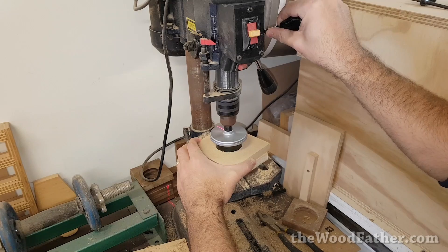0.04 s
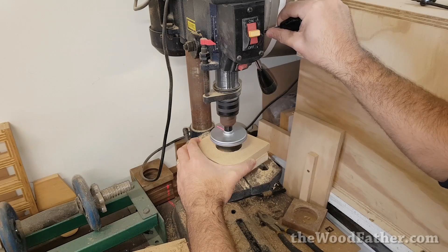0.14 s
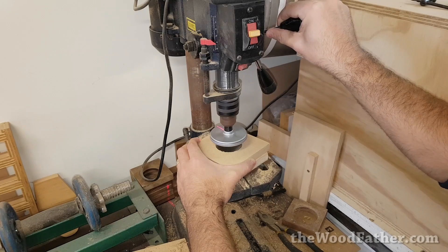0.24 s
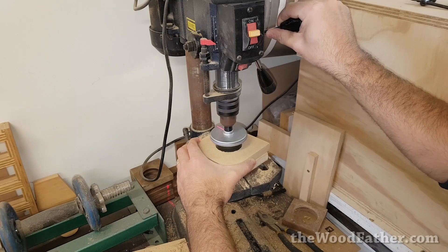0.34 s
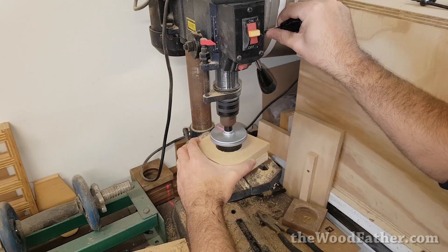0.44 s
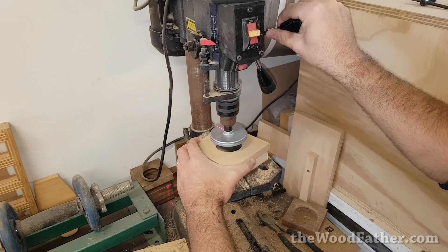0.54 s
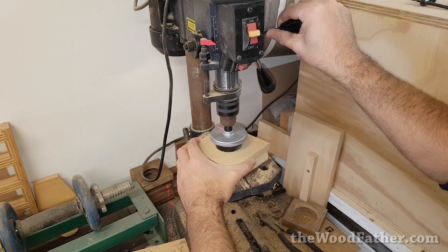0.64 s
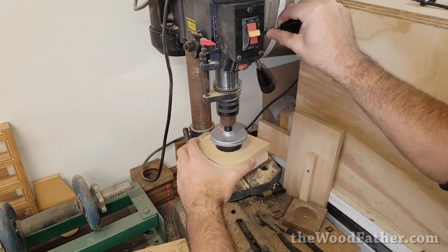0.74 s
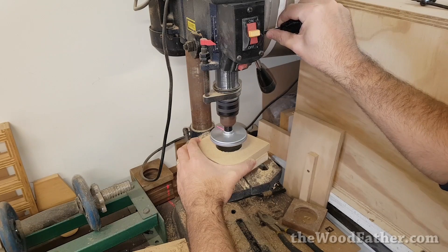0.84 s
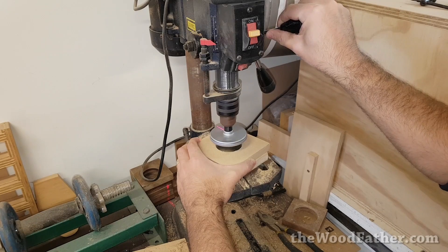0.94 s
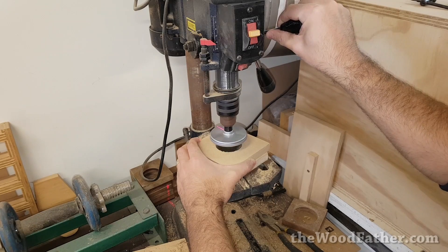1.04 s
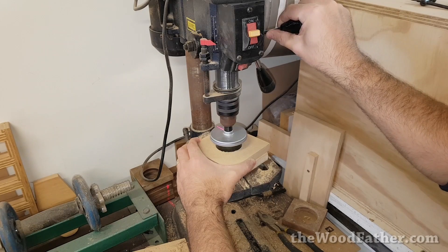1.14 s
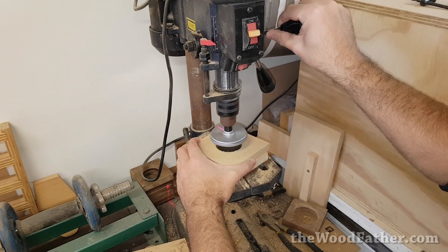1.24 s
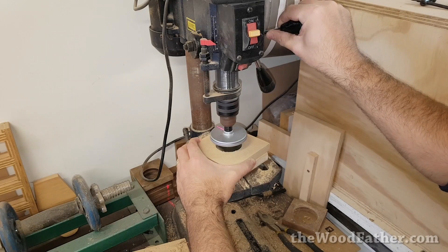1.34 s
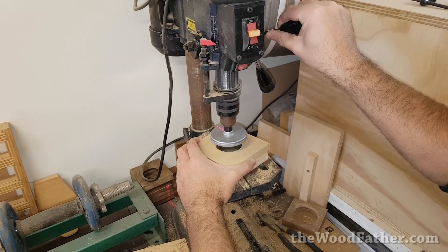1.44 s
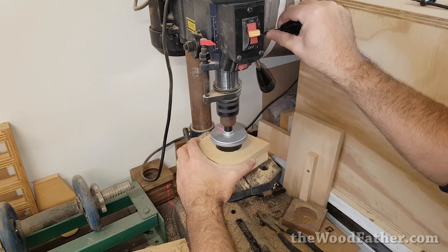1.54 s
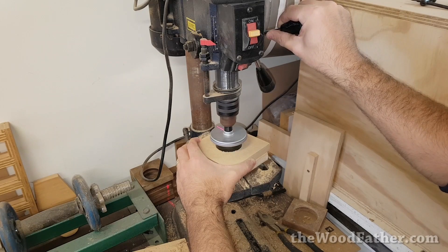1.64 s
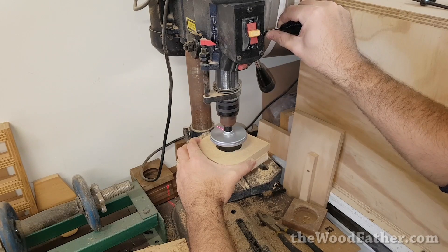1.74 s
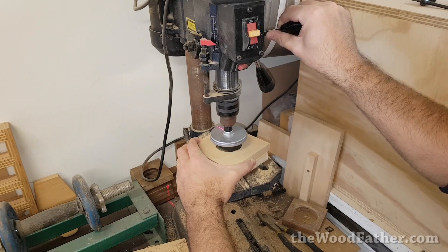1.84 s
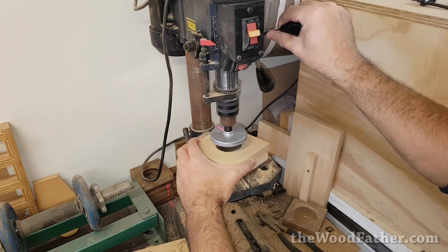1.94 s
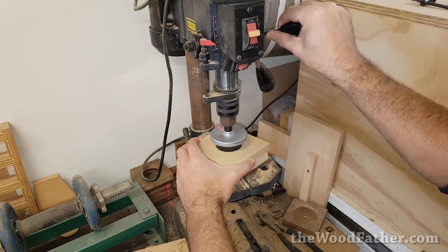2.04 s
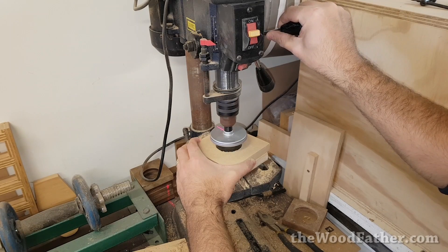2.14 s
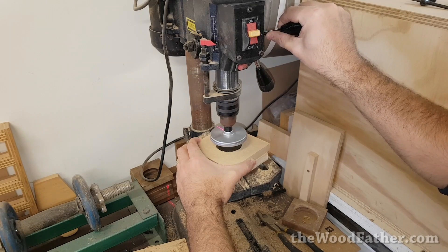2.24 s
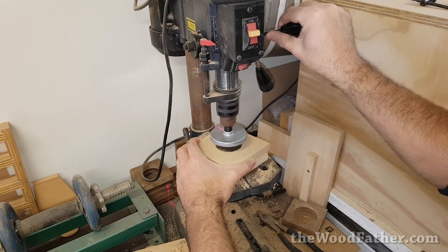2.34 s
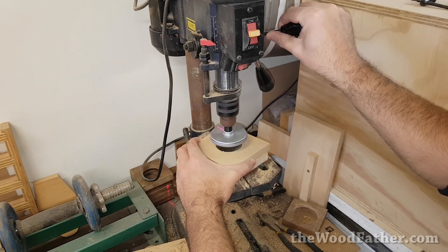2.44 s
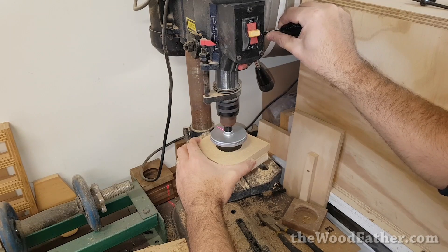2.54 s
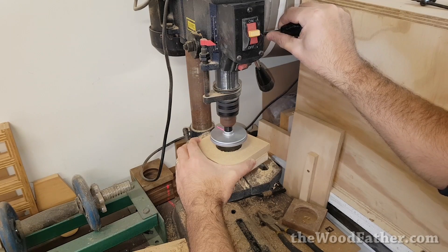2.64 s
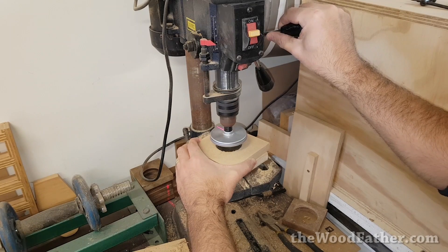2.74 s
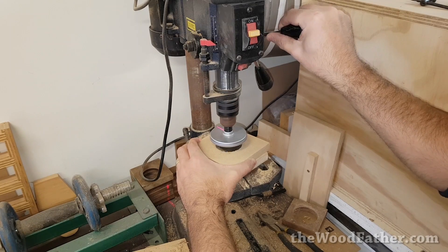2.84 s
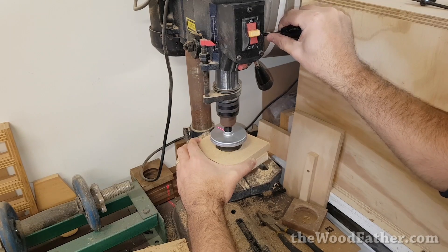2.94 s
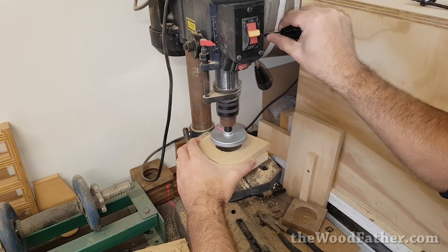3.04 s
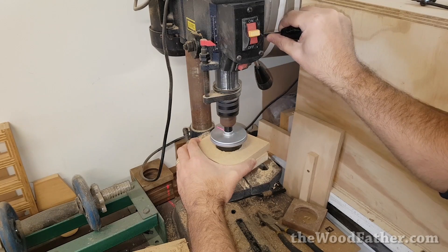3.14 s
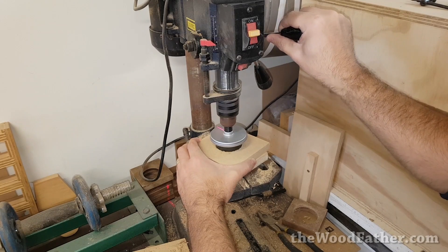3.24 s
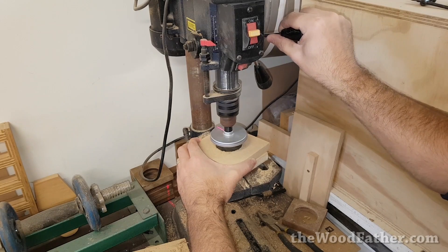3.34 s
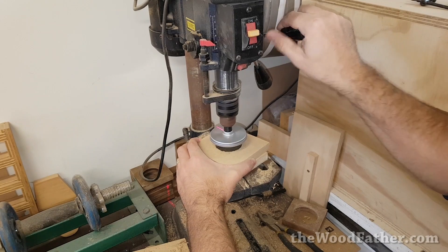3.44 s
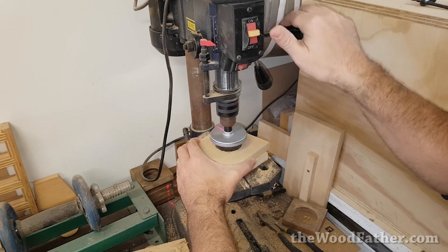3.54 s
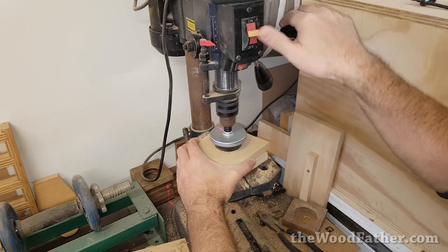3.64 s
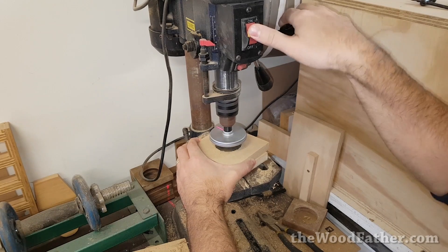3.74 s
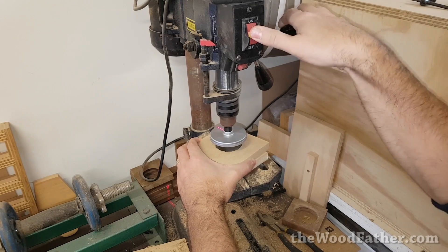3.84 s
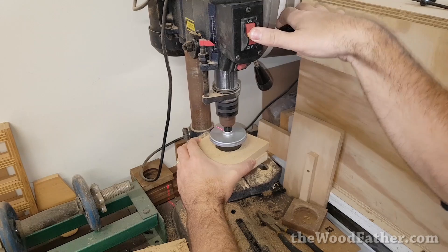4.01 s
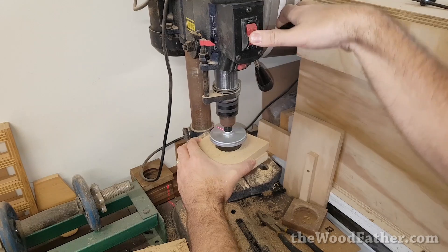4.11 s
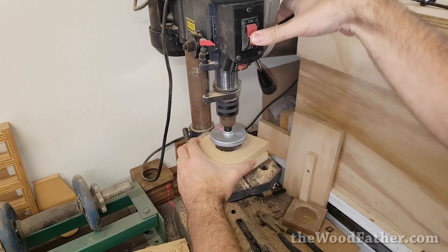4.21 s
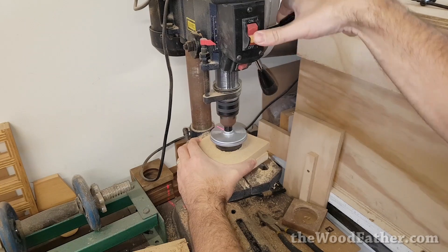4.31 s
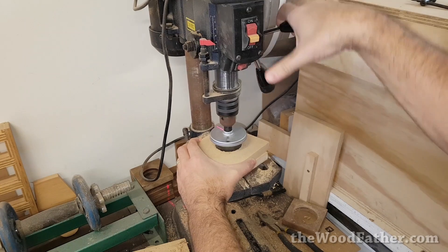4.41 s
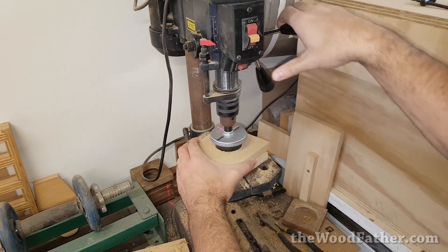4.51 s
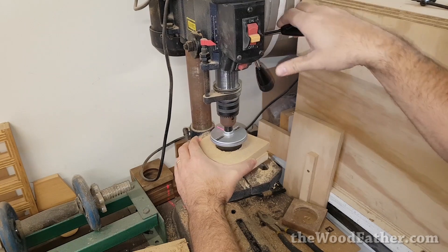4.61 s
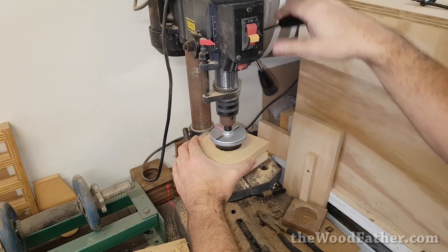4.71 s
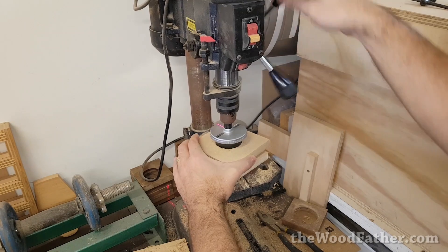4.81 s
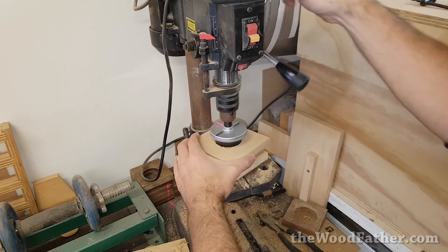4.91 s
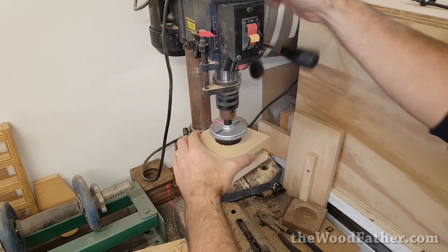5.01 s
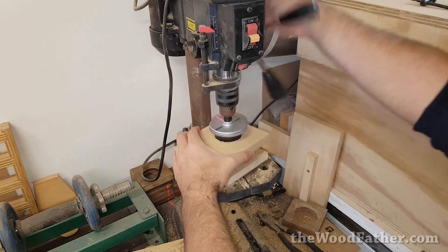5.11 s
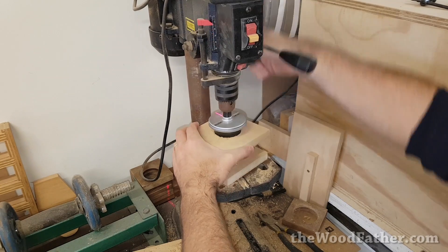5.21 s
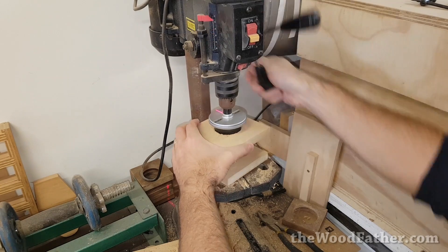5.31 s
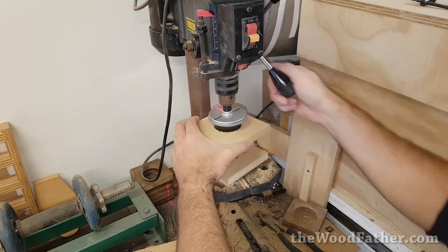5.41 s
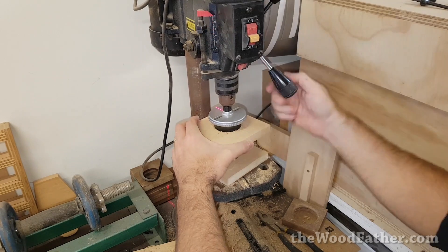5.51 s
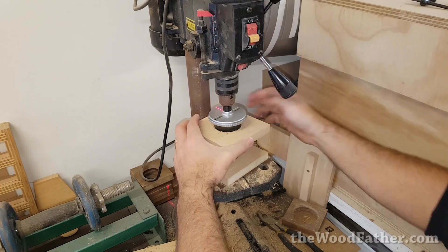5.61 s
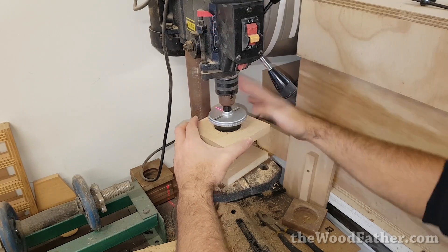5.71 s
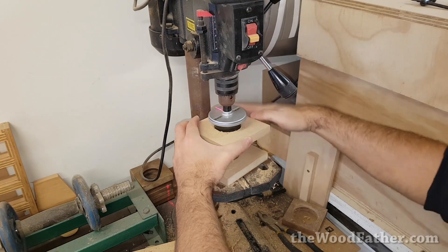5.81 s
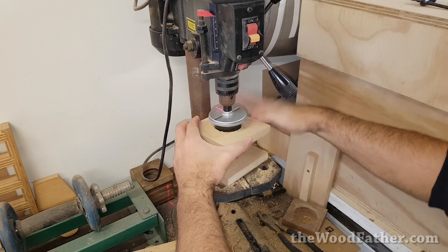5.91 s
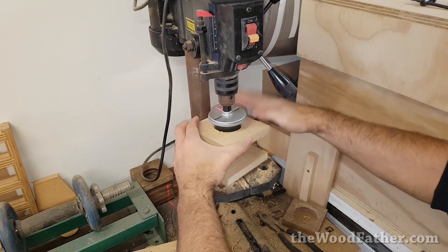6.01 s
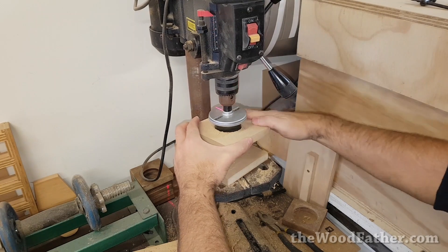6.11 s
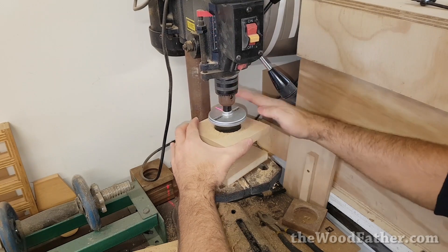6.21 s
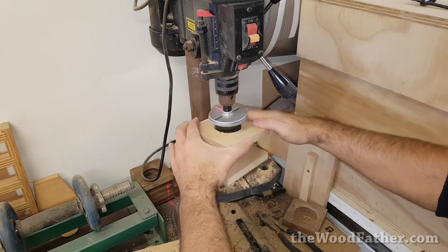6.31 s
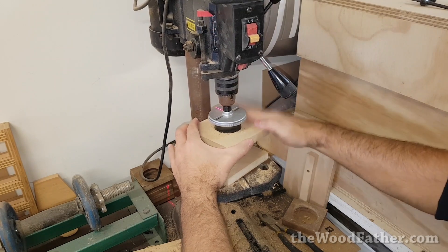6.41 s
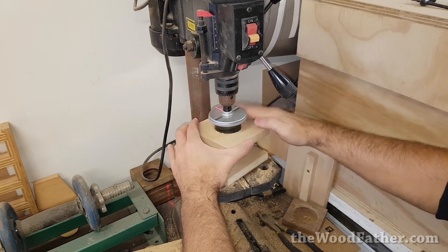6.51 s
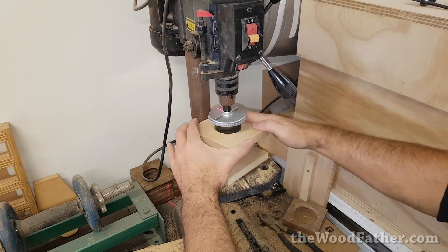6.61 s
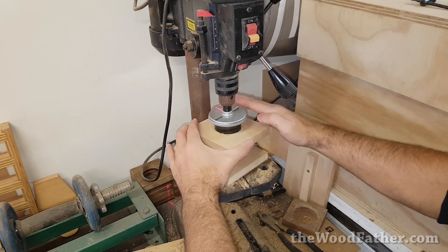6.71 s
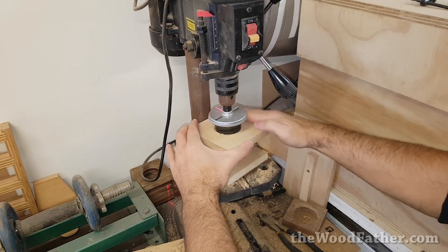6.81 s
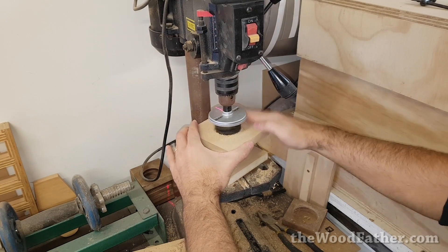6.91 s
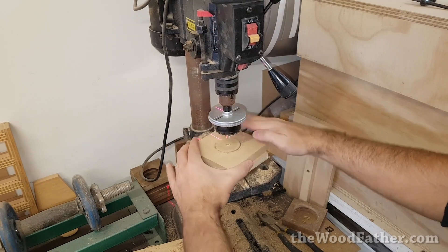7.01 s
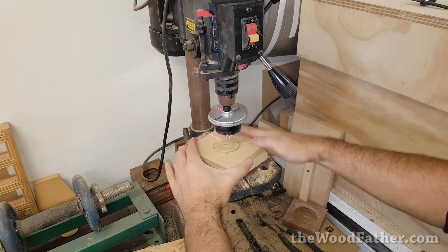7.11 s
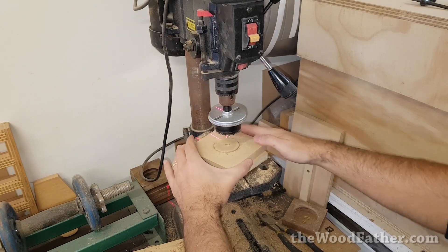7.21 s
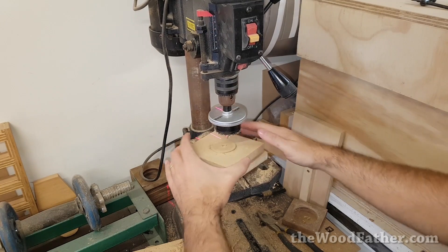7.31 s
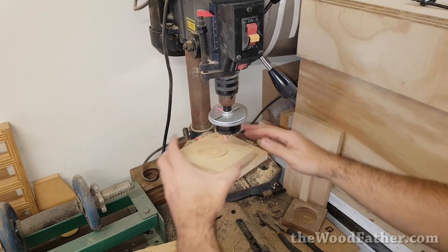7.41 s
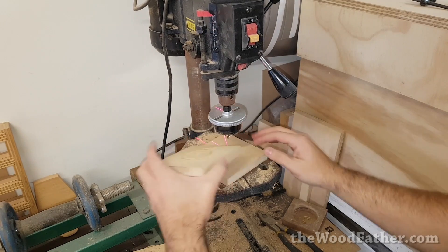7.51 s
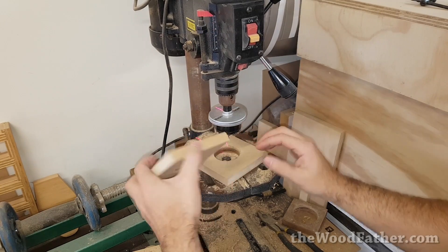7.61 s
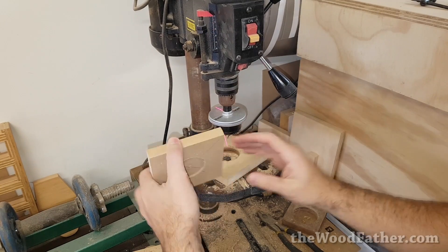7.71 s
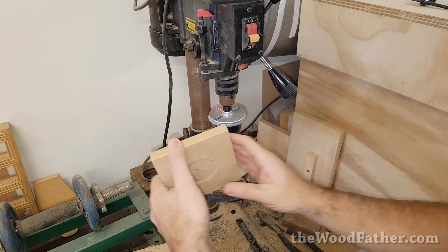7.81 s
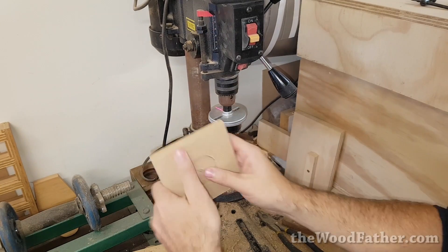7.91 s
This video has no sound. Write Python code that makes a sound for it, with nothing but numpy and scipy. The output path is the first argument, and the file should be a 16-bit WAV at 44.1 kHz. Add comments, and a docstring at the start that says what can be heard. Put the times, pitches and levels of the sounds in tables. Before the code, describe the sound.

In a small workshop, a drill press hums while a hole saw rasps and chatters through a wooden board. The cutting ends and the motor runs freely, then a switch snaps sharply and it winds down. The feed lever rattles and clanks back to its stop. A hand pats the board several times, and it drops with a loud wooden clap and slides faintly. The sounds are close, with a short room echo.

```python
"""A hole saw chatters and rasps through a board over the hum of a drill press in a small workshop. Its teeth
tear the wood and ring the cup; it breaks through, the feed eases, the switch snaps off and the motor coasts to
rest. The quill rattles up its rack and knocks on its stop. A hand pats the board off the saw; it drops on the
table, then rubs against the saw. Running parts are wavering tones and shaped noise; blows are noise puffs and
ringing modes with the shop's reverb."""
import sys
import numpy as np
from scipy import signal
from scipy.fft import rfft, irfft, next_fast_len
from scipy.io import wavfile
from scipy.ndimage import uniform_filter1d, map_coordinates

SR = 44100
rng = np.random.default_rng(int(sys.argv[2]) if len(sys.argv) > 2 else 0)


def unload_audio(sound):
    """Save the sound as a 16-bit wav file, at the path given as the first command line argument."""
    columns = np.transpose(np.atleast_2d(sound))
    # keep every value between -1 and 1, then stretch to whole-number steps
    steps = np.round(np.clip(columns, -1, 1) * 32767)
    wavfile.write(sys.argv[1], SR, steps.astype(np.int16))


N = 350595
TIME_S = np.arange(N) / SR

# powered shaft, sagging under load: time_s, speed_hz, free_fourth_order_db
SHAFT_SPEED = [(0, 45.1, -40), (.7, 40.56, -40), (1.3, 44.43, -40), (2.76, 45.16, -40), (2.9, 47.4, -40),
               (3.4, 47.8, -44), (3.56, 47.6, -35), (3.9, 48.4, -42), (4.1, 49.5, -32), (4.2, 47.5, -42)]
# main hum throbbing under load: time_s, relative_db
HUM_THROB = [(0.0, -32), (0.078, -15.5), (0.12, -41), (0.15, -26), (0.26, -20.5), (0.29, -24), (0.32, -21),
             (0.49, -34), (0.54, -26), (0.59, -38), (0.62, -23.5), (0.65, -39), (0.81, -29), (0.86, -37),
             (0.96, -30.5), (1.01, -32), (1.13, -28.5), (1.15, -32.5), (1.43, -20), (1.46, -37), (1.5, -24),
             (1.7, -30), (1.84, -24.5), (1.87, -44), (1.89, -20.5), (1.95, -31), (1.99, -20.5), (2.06, -31),
             (2.33, -19.5), (2.37, -32.5), (2.41, -20), (2.47, -31), (2.57, -27), (2.6, -33), (2.62, -34),
             (2.69, -35), (2.71, -25.5), (2.76, -21), (2.87, -40.5), (2.9, -19)]
# low shaft orders: multiple, cutting_db, free_db, roughness
SHAFT_LOW_ORDERS = [(1, -63, -53, 0.9), (2, -50, -42.5, 0.4), (3, -43.5, -56, 0.8)]
# faint shaft orders under power: multiple, level_db
SHAFT_WEAK_ORDERS = [(9, -46)]
# tooth strikes: time_s, rate_hz, third_relative_db, fourth_relative_db
TOOTH_STRIKES = [(0, 171.1, -43, -33.5), (.25, 169.6, -31.5, -34.5), (.4, 161.9, -30.5, -39),
                 (.55, 153.1, -35.5, -37), (.78, 154.3, -31, -36), (.95, 159.9, -38.5, -53),
                 (1.2, 171.5, -36, -35.5), (1.35, 173.3, -35.5, -35), (1.6, 171.2, -35, -37.5),
                 (1.8, 170, -39, -44), (2.05, 166.9, -37.5, -48), (2.35, 176, -34, -38.5),
                 (2.55, 165.2, -34, -43), (2.8, 170.2, -43, -41)]
# tooth-rate harmonics: multiple, re_cut_db
CHATTER_ORDERS = [(1, -14), (2, -14), (5, -15), (6, -17), (7, -23.5)]
# saw wall, rung as teeth catch: pitch_hz, re_cut_db
WALL_MODES = [(1040, -18.5), (1115, -17), (1200, -14), (1285, -12), (1335, -20)]
# saw cup singing as it sinks in: time_s, mid_mode_hz, mid_db, low_db, high_db
CUP_RASP = [(0, 3560, -41.5, -59, -60), (.6, 3540, -46, -72, -72), (1.1, 3546, -44.5, -64, -56),
            (1.5, 3456, -44, -51, -51), (2, 3420, -44.5, -43.5, -46), (2.27, 3433, -42.5, -47, -45.5),
            (2.75, 3314, -46, -43, -49), (2.899, 3255, -48, -56, -73), (4.15, 3047, -50, -60, -50),
            (4.5, 3000, -64, -75, -63)]

# thumb lands, rocker snaps: start_s, level_db, treble_edge_hz
SWITCH_HITS = [(3.746, -20.5, 2490), (4.155, -1.5, 30020)]
# motor's inner switch rubs, closes: start_s, level_db
INNER_SWITCH_HITS = [(4.474, -41.5), (4.58, -40.5)]
# two pulls upward: time_s, rumble_db, scrape_db
QUILL_PULLS = [(4.752, -37, -61.5), (4.8, -39, -59), (4.886, -36, -42.5), (5.006, -41.5, -73),
               (5.064, -42.5, -64.5), (5.19, -28, -37.5), (5.252, -31.5, -46.5), (5.412, -45.5, -65),
               (5.46, -48, -57), (5.6, -75, -85)]
# quill shaking after its stop: start_s, rumble_db, scrape_db
QUILL_SHUDDERS = [(5.472, -30, -41.5), (5.602, -55, -49.5)]
# pinion teeth: start_s, ring_db, tick_db
RACK_HITS = [(4.75, -44.5, -41), (4.807, -41, -39.5), (4.839, -41, -35), (4.866, -40, -34),
             (4.886, -46, -38.5), (4.92, -41, -38), (4.977, -38, -49), (5.012, -35.5, -47),
             (5.05, -37.5, -39), (5.084, -37, -38), (5.114, -53, -34), (5.137, -38, -33), (5.158, -38, -33),
             (5.175, -46.5, -30.5), (5.193, -46.5, -30.5), (5.213, -34, -31)]
# quill and lever knocks: start_s, clank_db, thud_db, treble_edge_hz, ring_hz
STOP_HITS = [(4.888, -26.5, -28, 6000, 2840), (5.226, -28, -51, 5010, 1940), (5.237, -22.5, -38, 3000, 510),
             (5.257, -25.5, -44, 6060, 2760), (5.474, -24, -23, 5990, 2900),
             (5.487, -23.5, -34, 7000, 1840), (5.603, -30.5, -40, 3520, 1700),
             (5.617, -37, -43, 3510, 1640), (5.643, -48, -43, 3000, 1500)]
# hand on the board: start_s, slap_db, treble_edge_hz, thump_db, pitch_hz
PAT_HITS = [(5.801, -36, 2500, -48, 250), (5.811, -37, 8970, -27.5, 256), (5.884, -49, 9000, -46, 220),
            (5.991, -34, 14000, -27, 274), (6.158, -33, 14000, -26, 217), (6.324, -34, 13950, -24, 222),
            (6.489, -32.5, 25000, -30, 250), (6.656, -31.5, 25000, -25.5, 221),
            (6.823, -32, 25000, -27.5, 227), (6.887, -43.5, 20000, -38.5, 238),
            (6.9, -37.5, 20000, -47.5, 240), (6.911, -43.5, 20000, -52, 240),
            (6.982, -31.5, 25000, -32, 257)]
# board lands, settles: start_s, clap_db, thud_db, treble_edge_hz
DROP_HITS = [(7.054, -3.5, -35, 30000), (7.178, -17.5, -27.5, 1210)]

# noise spectra: freq_hz, density_db
TEARING_SPECTRUM = [(130, -33), (220, -28), (254, -9.5), (364, -8), (502, -5.5), (569, -3.5), (681, -5),
                    (907, -9), (1230, -4.5), (2260, -18), (3610, -20), (4240, -21.5), (7270, -23.5),
                    (14900, -36), (16000, -30.5)]
DRONE_SPECTRUM = [(32, -51.5), (55, -18), (92, -5), (124, -7), (194, 4.5), (328, -11.5), (403, -4.5),
                  (438, -4), (510, -7.5), (636, -12.5), (741, -24.5), (1500, -31), (3300, -120)]
WHIRR_SPECTRUM = [(410, -28), (700, 0), (830, 2.5), (984, -5.5), (1060, 0), (1400, -8), (1890, -10.5),
                  (3200, -8.5), (3990, -14), (7200, -15.5), (9730, -20.5), (14600, -24), (16000, -26.5)]
AIR_SPECTRUM = [(15, -34), (25, -0.5), (105, 3.5), (145, -6.5), (206, -5.5), (754, -19.5), (1400, -25.5),
                (2760, -28.5), (9570, -42.5), (13600, -31), (16000, -38.5)]
SNAP_SPECTRUM = [(180, -40.5), (300, -27), (337, -36), (398, -10), (723, -13.5), (1020, -7), (1130, -7),
                 (2020, -18), (2590, -15.5), (5650, -28), (12500, -31.5), (15800, -33.5)]
BENCH_THUD_SPECTRUM = [(21, -42.5), (35, -19), (64, -12), (140, -6.5), (194, 2.5), (237, -4), (458, -5.5),
                       (627, -23.5), (931, -29), (1800, -29), (2340, -64), (3960, -120)]
INNER_SWITCH_SPECTRUM = [(700, -3.5), (1200, -12), (1750, 1.5), (2300, -7), (3000, -12), (4500, -32),
                         (16000, -46.5)]
SCRAPE_SPECTRUM = [(530, -4), (900, 0.5), (956, -11), (1120, 1), (1400, -0.5), (1870, 2), (6280, -15),
                   (7510, -15), (9660, -19), (15800, -20.5)]
TICK_FIZZ_SPECTRUM = [(3500, -33.5), (7400, 5), (9500, -2), (13000, -4.5), (15800, -7)]
SLAP_SPECTRUM = [(400, -26.5), (750, -11.5), (1600, -6), (2300, -14), (3100, -9.5), (4200, -17),
                 (8000, -20.5), (13000, -22.5), (16000, -21.5)]
BOARD_CLAP_SPECTRUM = [(82, -34), (140, -11), (269, -10), (335, 1), (479, -5), (529, -10), (1100, -0.5),
                       (1370, -8), (1700, -5.5), (2300, -11), (2900, -10.5), (3700, -21), (7380, -38.5),
                       (11900, -48.5), (15100, -56.5), (16000, -88.5)]
# press answering the palm: pitch_multiple, density_db
PALM_SPECTRUM = [(.1, -46), (.3, -10.5), (.6, -5), (1, -3.5), (1.5, -9), (2.1, -11.5), (2.8, -25.5),
                 (7, -29), (15, -100)]

# body resonances: centre_hz, width_hz, gain_db
HEAD_CASTING_PEAKS = [(187, 14, -5), (320.2, 10, -6.5), (405, 10, -5.5), (463, 11, -8), (508, 25, -16.5),
                      (662, 15, -19), (849, 16, -14.5), (1037, 25, -17), (1120, 43, -11), (1186, 49, -13.5),
                      (1288, 56, -16), (1660, 100, -16.5)]
SWITCH_BOX_PEAKS = [(430, 90, 5.5), (880, 150, 0.5), (1360, 240, 4), (1660, 320, -0.5), (2900, 830, -5),
                    (6000, 3300, -24.5), (12100, 1700, -9)]
SLEEVE_PEAKS = [(175, 56, 4.5), (477, 79, 3), (842, 29, -8), (1120, 160, -12.5)]
BOARD_EDGE_PEAKS = [(1100, 240, 5), (2900, 800, -1.5)]
BOARD_RUB_PEAKS = [(1620, 300, -8), (2150, 250, -9), (3050, 240, 1), (5670, 500, -15), (7300, 1070, -19)]
# struck modes: pitch_hz, level_db, t60_s
PINION_MODES = [(3450, 0, .035), (4650, -6, .03), (7400, -11, .03)]
BOARD_MODES = [(165, -4, .1), (240, -5, .07), (335, -4, .07), (470, -1, 0.06), (673, -7, .04),
               (953, -8, .08), (1110, -1, 0.3), (1696, -7, .09), (2430, -11, .1), (2760, 3, .01)]

# shop reverb: freq_hz, t60_s
SHOP_DECAY = [(100, 0.86), (400, 0.27), (2000, 0.35), (10000, 0.31)]
# left-right likeness: freq_hz, correlation
STEREO_LIKENESS = [(60, 0.92), (120, 0.98), (240, 0.92), (480, 0.87), (950, 0.32), (1890, 0.23),
                   (3770, 0.33), (7520, 0.19), (15000, -0.23)]
# channel balance: freq_hz, left_over_right_db
STEREO_LEAN = [(60, -3), (180, 0.5), (550, -2), (1650, -1.5), (4970, -2), (15000, 2)]

THROUGH_S, EASE_S, OFF_S = 2.79, 3.54, 4.155  # breakthrough, feed let go, power cut
SPINDLE_RATIO, BELT_RATIO = .36, .17  # turns per shaft turn
LEFT_RIGHT = np.array([[1], [-1]])


def amp(db):
    """Gain of a level in dB."""
    return 10 ** (np.asarray(db) / 20)


def unit(x):
    """x at rms 1."""
    return x / np.sqrt(np.mean(x ** 2) + 1e-20)


def along(points, hz):
    """Interpolate (freq_hz, value) points on a log axis."""
    knots_hz, values = np.transpose(points)
    return np.interp(np.log(hz + 1), np.log(knots_hz + 1), values)


def curves(rows):
    """One value per sample for each column after the time."""
    knots_s, *columns = np.transpose(rows)
    return [np.interp(TIME_S, knots_s, column) for column in columns]


def during(start_s, end_s, edge_s=.033):
    """1 between two times, with soft edges."""
    fade_in = np.clip((TIME_S - start_s) / edge_s + .5, start_s <= 0, 1)
    return fade_in * np.clip((end_s - TIME_S) / edge_s + .5, 0, 1)


def wobble(rate_hz):
    """Smooth random curve, rate_hz knots a second."""
    knots = rng.standard_normal(int(N * rate_hz / SR) + 4)
    coarse = np.arange(N // 32 + 2) * 32
    return np.interp(np.arange(N), coarse, map_coordinates(knots, [coarse * rate_hz / SR]))


def tone(phase, db, roughness, rate_hz=10):
    """Sine wavering in level and phase."""
    gain = amp(db + 3.03 * roughness * wobble(rate_hz))
    return gain * np.sqrt(2) * np.sin(phase + roughness * wobble(1.2 * rate_hz))


def filtered(x, response):
    """x through a complex frequency response."""
    size = next_fast_len(x.shape[-1] + 8192)
    return irfft(rfft(x, size) * response(np.fft.rfftfreq(size, 1 / SR)), size)[..., :x.shape[-1]]


def dulled(x, edge_hz):
    """A softer contact loses treble."""
    return filtered(x, lambda hz: 1 / (1 + 1j * hz / edge_hz) ** 2)


def shape(spectrum):
    """Response of a spectrum table."""
    return lambda hz: amp(along(spectrum, hz))


def body(peaks):
    """Response of resonances of alternating sign."""
    return lambda hz: sum(
        (-1) ** k * amp(db) * 1j * hz * width_hz / (centre_hz ** 2 - hz ** 2 + 1j * hz * width_hz)
        for k, (centre_hz, width_hz, db) in enumerate(peaks))


def casting(peaks, bass_edge_hz):
    """Response of a body that radiates no deep bass."""
    return lambda hz: body(peaks)(hz) * hz ** 2 / (hz ** 2 + bass_edge_hz ** 2)


def stereo(pair, response):
    """Filter two unrelated noises; mix them alike in the bass, loose in the treble."""
    def mid_side(hz):
        angle = np.arccos(np.clip(along(STEREO_LIKENESS, hz), -1, 1)) / 2
        return response(hz) * np.array([np.cos(angle), np.sin(angle)])
    mid, side = filtered(pair, mid_side)
    return np.array([mid + side, mid - side])


def rush(response, patchy_db):
    """Stereo noise of rms 1 with patches of random gain."""
    bins = signal.stft(rng.standard_normal((2, N)), nperseg=512)[2]
    patches = uniform_filter1d(rng.standard_normal(bins.shape[1:]), size=5, axis=0)
    patches = unit(uniform_filter1d(patches, size=10, axis=1))
    noise = signal.istft(bins * amp(patchy_db * patches), nperseg=512)[1][:, :N]
    return unit(stereo(noise, response))


def click(peaks):
    """Hard impulse through resonances, peak 1."""
    x = filtered(signal.unit_impulse(SR // 3), body(peaks))
    return x / np.abs(x).max()


def puff(spectrum, rise_s, t60_s):
    """Coloured noise that swells and dies, its energy set by the envelope."""
    t = np.arange(SR // 3) / SR
    swell = (1 - np.exp(-t / rise_s)) ** 2 * amp(-60 * t / t60_s)
    noise = filtered(rng.standard_normal(len(t)), shape(spectrum)) * swell
    return unit(noise) * np.sqrt(np.mean(swell ** 2)) / swell.max() / 2


def ring(modes, rise_s, detune=0.01):
    """Struck modes, varied in strength and pitch, peak 1."""
    t = np.arange(SR // 3) / SR
    x = 0
    for hz, db, t60_s in modes:
        decay = amp(db + rng.normal(0, 1.5) - 60 * t / t60_s)
        x += decay * np.sin(2 * np.pi * hz * (1 + detune * rng.normal()) * t)
    x *= 1 - np.exp(-t / rise_s)
    return x / np.abs(x).max()


def place(out, start_s, blow, wet_db, diffuse_hz=500, left_over_right_db=-2):
    """Add a blow right of centre with shop reverb: echoes in the bass, a diffuse wash above."""
    padded = np.pad(blow, (256, SR // 2))
    hz, t, noise = signal.stft(rng.standard_normal((2, 2, len(padded))), SR, nperseg=256)
    decay = amp(-60 * t / along(SHOP_DECAY, hz)[:, None])
    power = np.abs(signal.stft(padded, nperseg=256)[2]) ** 2
    wash_power = np.abs(signal.fftconvolve(power, decay ** 2, axes=1)[:, :len(t)])
    wash_power /= np.sum(decay ** 2, axis=1).mean() * np.mean(np.abs(noise) ** 2)
    wash = signal.istft(noise[0] * np.sqrt(wash_power), nperseg=256)[1][:, :len(padded)]
    tail = signal.istft(noise[1] * decay, nperseg=256)[1]
    echoes = signal.fftconvolve(padded[None], tail / np.linalg.norm(tail[0]), axes=1)[:, :len(padded)]
    low = lambda hz: 1 / np.sqrt(1 + (hz / diffuse_hz) ** 4)
    high = lambda hz: np.sqrt(1 - low(hz) ** 2)
    heard = amp(wet_db) * (stereo(echoes, low) + stereo(wash, high))
    heard[:, :len(blow)] += blow * amp(left_over_right_db / 2 * LEFT_RIGHT)
    span = out[:, round(start_s * SR):][:, :heard.shape[1]]
    span += heard[:, :span.shape[1]]


def shaft(coast_hz_per_s=63.7):
    """Shaft coasting down after power-off: its angle, and its speed against powered speed."""
    powered_hz = curves(SHAFT_SPEED)[0]
    coasting_s = np.maximum(TIME_S - SHAFT_SPEED[-1][0], 0)
    hz = np.maximum(powered_hz - coast_hz_per_s * coasting_s, 1)
    return 2 * np.pi * np.cumsum(hz) / SR, 20 * np.log10(hz / powered_hz)


def motor_hum(shaft_rad, speed_db, head_hz=176, left_lead_rad=0.34, fade_db_per_db=7):
    """Shaft orders shake the head; under load the main hum sits on the head's own pitch."""
    cutting = during(0, THROUGH_S, 0.074)
    loaded = during(0, HUM_THROB[-1][0], 0.044)
    belt = 1 + 0.5 * np.sin(BELT_RATIO * shaft_rad + 1.5 * wobble(3.02))
    free = belt * tone(4 * shaft_rad, curves(SHAFT_SPEED)[1], .7, rate_hz=18)
    head_rad = 2 * np.pi * head_hz * TIME_S + left_lead_rad / 2 * LEFT_RIGHT + 0.63 * wobble(30)
    throb = tone(head_rad, curves(HUM_THROB)[0] - 1, 0.53)
    low = sum(tone(k * shaft_rad, free_db + cutting * (cut_db - free_db), roughness)
              for k, cut_db, free_db, roughness in SHAFT_LOW_ORDERS)
    weak = sum(tone(k * shaft_rad, db, 0.068) for k, db in SHAFT_WEAK_ORDERS)
    hum = (1 - loaded) * free + loaded * throb + low
    return amp(fade_db_per_db * speed_db) * hum + during(0, OFF_S) * weak


def saw_teeth(shaft_rad, cut_db=-29.5, sag_db_per_s=2.01):
    """Teeth tear the wood, hardest once a spindle turn, and shake the head casting and saw wall."""
    tooth_hz, third_db, fourth_db = curves(TOOTH_STRIKES)
    tooth_rad = 2 * np.pi * np.cumsum(tooth_hz) / SR
    bite_db = np.sin(SPINDLE_RATIO * shaft_rad + 0.56 * wobble(2)) + 0.48 * wobble(11)
    fibres = rush(shape(TEARING_SPECTRUM), patchy_db=1.5)
    head = amp(-4) * rush(casting(HEAD_CASTING_PEAKS, 110), patchy_db=2.5)
    chatter = sum(tone(k * tooth_rad, db + 4 * wobble(8), .9, rate_hz=26) for k, db in CHATTER_ORDERS)
    wall = sum(tone(2 * np.pi * hz * TIME_S, db + 4 * wobble(20), 1, rate_hz=40)
               for hz, db in WALL_MODES)
    whine = sum(tone(k * tooth_rad, db, .9, rate_hz=22) for k, db in ((3, third_db), (4, fourth_db)))
    cut = amp(cut_db - sag_db_per_s * TIME_S) * (amp(bite_db) * (fibres + head + wall) + chatter)
    return during(0, THROUGH_S, 0.047) * (cut + amp(-3) * whine)


def cup_rasp(shaft_rad, low_hz=2953, high_hz=4460):
    """Noise bands around three modes of the saw's cup, each biting in short bursts."""
    mid_hz, *levels_db = curves(CUP_RASP)
    out = 0
    for mode_hz, db, half_width_hz in zip((mid_hz, low_hz, high_hz), levels_db, (230, 170, 480)):
        noise = filtered(rng.standard_normal((2, 2, N)), lambda hz: 1 / (1 + (hz / half_width_hz) ** 4))
        phase = 2 * np.pi * np.cumsum(mode_hz * (1 + .015 * wobble(16))) / SR
        band = noise[0] * np.cos(phase) + noise[1] * np.sin(phase)
        bursts = amp(2.6 * wobble(34) + 1.2 * np.sin(SPINDLE_RATIO * shaft_rad))
        out += amp(db) * unit(bursts * band)
    return during(0, CUP_RASP[-1][0]) * out


def drivetrain(speed_db, free_drone_db=-31.5, eased_whirr_db=-39.5):
    """Belt, pulleys and bearings: a drone and a whirr that die as the motor coasts."""
    drone_db = free_drone_db - 2 * during(0, THROUGH_S, 0.2) + 3.3 * speed_db
    whirr_db = eased_whirr_db + 4 * during(0, EASE_S, 0.2) + 4.03 * speed_db
    drone = amp(drone_db + 1.3 * wobble(9.2)) * rush(shape(DRONE_SPECTRUM), patchy_db=1.5)
    whirr = amp(whirr_db + .6 * wobble(15)) * rush(shape(WHIRR_SPECTRUM), patchy_db=.6)
    return drone + whirr


def shop_air(level_db=-54.5):
    """Still air: a faint low rush."""
    return amp(level_db) * rush(shape(AIR_SPECTRUM), patchy_db=1.5)


def power_switch(out):
    """Thumb and rocker ring the switch box and jolt the press."""
    for start_s, db, edge_hz in SWITCH_HITS:
        snap = 0.87 * click(SWITCH_BOX_PEAKS) + 0.5 * puff(SNAP_SPECTRUM, 0.00011, 0.046)
        thud = 0.066 * puff(BENCH_THUD_SPECTRUM, 0.0048, 0.11)
        place(out, start_s, amp(db) * dulled(snap + thud, edge_hz), wet_db=-4.5)


def inner_switch(out):
    """Two faint ticks, likely the motor's inner switch closing as the shaft slows."""
    for start_s, db in INNER_SWITCH_HITS:
        place(out, start_s, amp(db) * puff(INNER_SWITCH_SPECTRUM, 0.00156, 0.05), wet_db=3)


def quill_rise(shudder_db_per_s=183):
    """The quill rumbles in its sleeve, the saw scrapes as it drags the board; both end in a shudder."""
    gains = amp(curves(QUILL_PULLS)) * during(QUILL_PULLS[0][0], QUILL_PULLS[-1][0], .012)
    for start_s, *levels_db in QUILL_SHUDDERS:
        shudder = amp(np.c_[levels_db] - shudder_db_per_s * np.maximum(TIME_S - start_s, 0))
        gains = np.hypot(gains, during(start_s, N / SR, .012) * shudder)
    rumble = amp(0.35 * wobble(35)) * rush(casting(SLEEVE_PEAKS, 100), patchy_db=1)
    scrape = amp(2.5 * wobble(90)) * rush(shape(SCRAPE_SPECTRUM), patchy_db=2.5)
    return gains[0] * rumble + gains[1] * scrape


def rack_teeth(out, first_hz=1736, fall_per_s=1.27, firm_tick_db=-34.5):
    """Pinion teeth tick on the rack; its ring sinks as the quill rises, and firm ticks fizz."""
    for start_s, ring_db, tick_db in RACK_HITS:
        fizz_db = -42.5 + 3 * (tick_db - firm_tick_db)
        fizz = amp(fizz_db) * puff(TICK_FIZZ_SPECTRUM, 0.00046, 0.012)
        tick = dulled(puff(SCRAPE_SPECTRUM, 0.0006, 0.024), 8900)
        tick += 0.5 * ring(PINION_MODES, 0.00026, detune=0.0195)
        ring_hz = first_hz * np.exp(-fall_per_s * (start_s - RACK_HITS[0][0]))
        rack = amp(ring_db) * ring([(ring_hz, 0, .04)], 0.00052)
        place(out, start_s, rack + amp(tick_db) * tick + fizz, wet_db=2)


def quill_stop(out):
    """Quill and lever clank on their guides and stop, shaking press and bench."""
    for start_s, clank_db, thud_db, edge_hz, ring_hz in STOP_HITS:
        clank = puff(SCRAPE_SPECTRUM, 0.0011, 0.038) + 0.87 * ring([(ring_hz, 0, .024)], 0.00045)
        thud = amp(thud_db) * puff(BENCH_THUD_SPECTRUM, 0.0022, 0.077)
        place(out, start_s, amp(clank_db) * dulled(clank, edge_hz) + thud, wet_db=-2.5)


def hand_pats(out):
    """Each pat slaps the board; the soft palm loads the press slowly, giving a thump."""
    for start_s, slap_db, edge_hz, thump_db, pitch_hz in PAT_HITS:
        slap = puff(SLAP_SPECTRUM, 0.0066, 0.024) + 0.25 * ring([(3180, 0, .016)], .008, detune=0.088)
        place(out, start_s, amp(slap_db) * dulled(slap, edge_hz), wet_db=-3)
        thump = puff([(k * pitch_hz, db) for k, db in PALM_SPECTRUM], rise_s=0.018, t60_s=0.093)
        place(out, start_s, amp(thump_db) * thump, wet_db=-1.5)


def board_drop(out):
    """The board claps on the table, rings, clicks on its hard edge and shakes the bench."""
    for start_s, clap_db, thud_db, edge_hz in DROP_HITS:
        clap = puff(BOARD_CLAP_SPECTRUM, 0.00084, 0.046)
        clap += 0.39 * ring(BOARD_MODES, 0.0036, detune=0.0037)
        clap += 0.14 * click(BOARD_EDGE_PEAKS)
        thud = amp(thud_db) * puff(BENCH_THUD_SPECTRUM, 0.0018, 0.027)
        place(out, start_s, amp(clap_db) * dulled(clap, edge_hz) + thud, wet_db=-0.5)


def board_slide(start_s=7.3, shove_s=7.48, squeak_s=7.53, end_s=7.645, squeak_hz=1270):
    """The board rubs against the saw, shoved harder midway, then squeaks faintly."""
    rub_db = -61 + 7 * np.exp(-((TIME_S - shove_s) / 0.047) ** 2)
    rub = amp(rub_db + 1.9 * wobble(70)) * rush(body(BOARD_RUB_PEAKS), patchy_db=2.5)
    squeak = tone(2 * np.pi * squeak_hz * TIME_S + 1.5 * wobble(60), db=-67, roughness=.8)
    return during(start_s, end_s, .06) * rub + during(squeak_s, end_s) * squeak


def scene():
    """Press, shop air and handling, in stereo."""
    shaft_rad, speed_db = shaft()
    out = motor_hum(shaft_rad, speed_db) + shop_air()
    out += saw_teeth(shaft_rad) + cup_rasp(shaft_rad) + drivetrain(speed_db) + quill_rise()
    for add_blows in (power_switch, inner_switch, rack_teeth, quill_stop, hand_pats, board_drop):
        add_blows(out)
    return out + board_slide()


def record(dry):
    """Channel balance leans with frequency; hard band limit."""
    top_hz = 15950
    return filtered(dry, lambda hz: amp(along(STEREO_LEAN, hz) / 2 * LEFT_RIGHT) * (hz < top_hz))


dry = scene()
out = record(dry)
unload_audio(out)
```